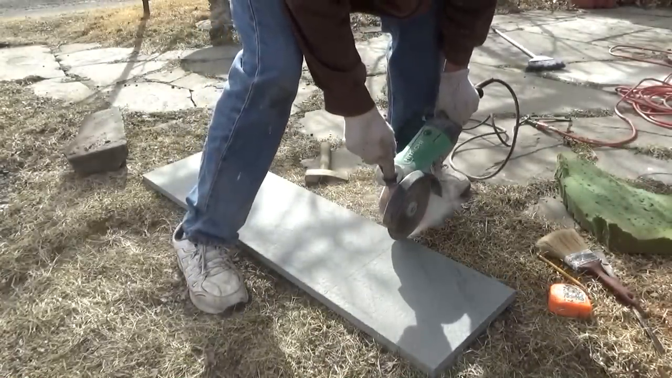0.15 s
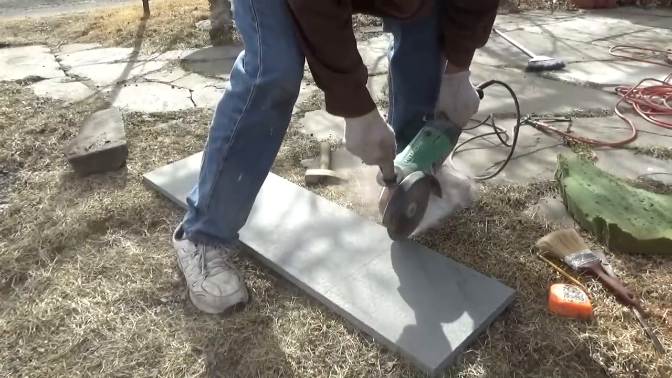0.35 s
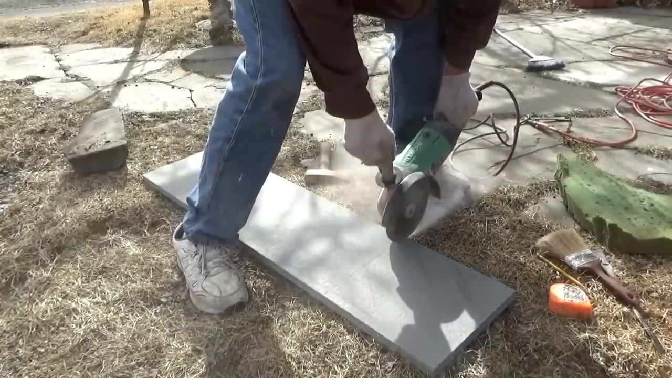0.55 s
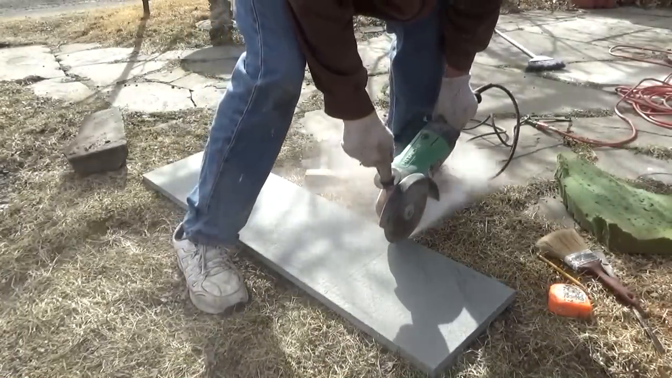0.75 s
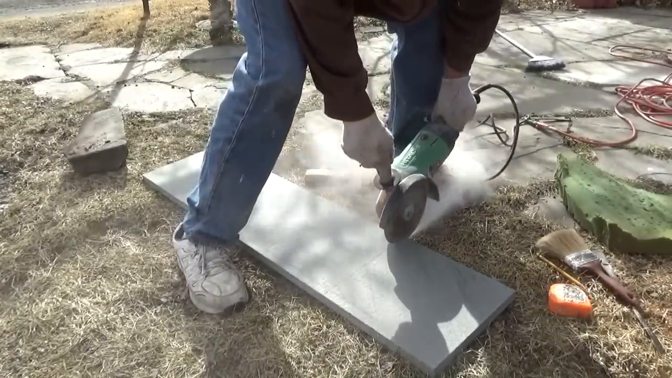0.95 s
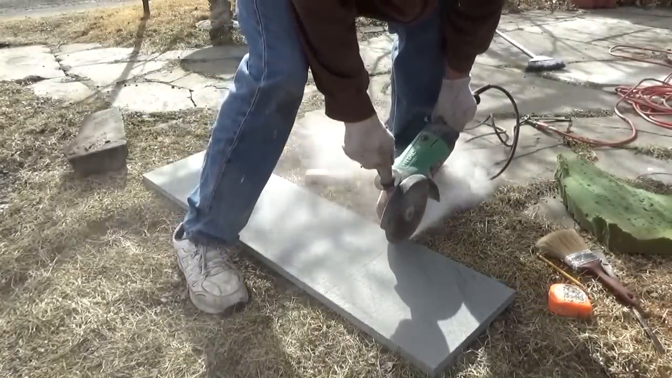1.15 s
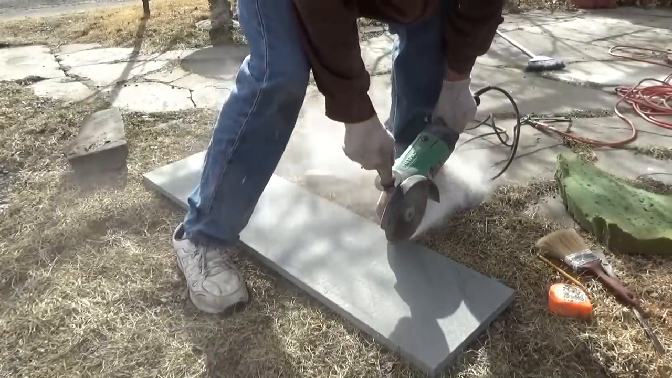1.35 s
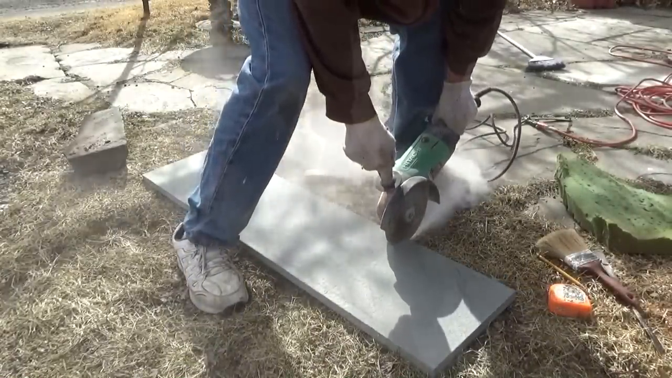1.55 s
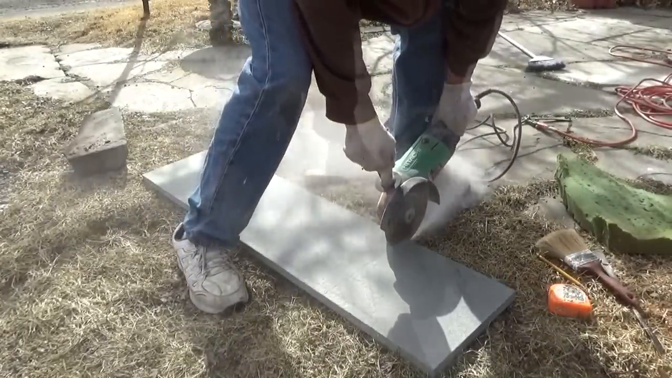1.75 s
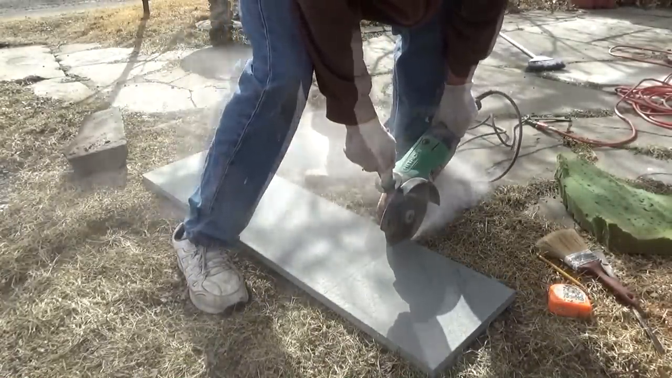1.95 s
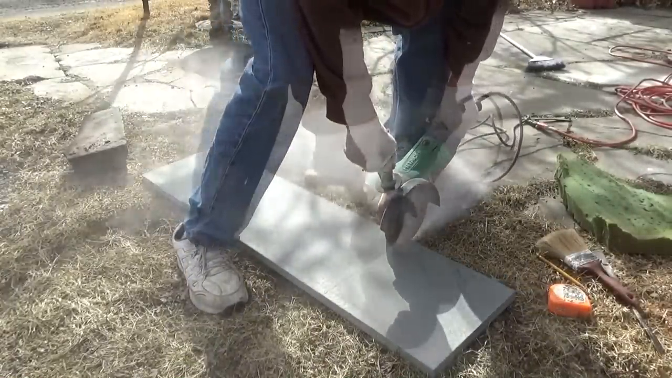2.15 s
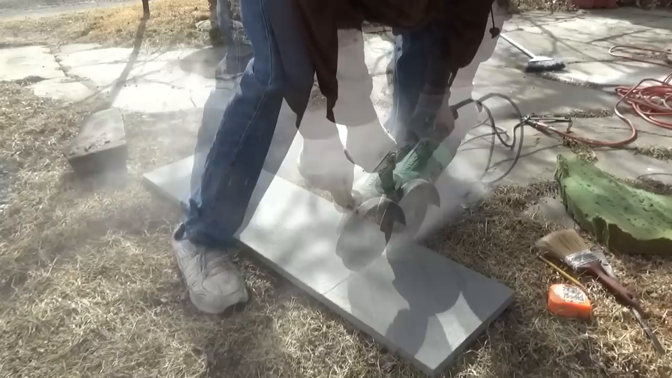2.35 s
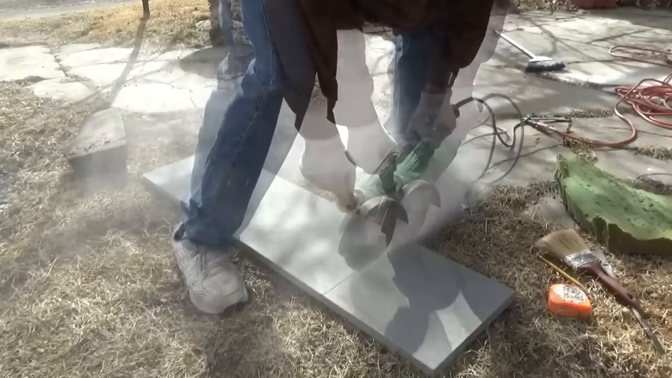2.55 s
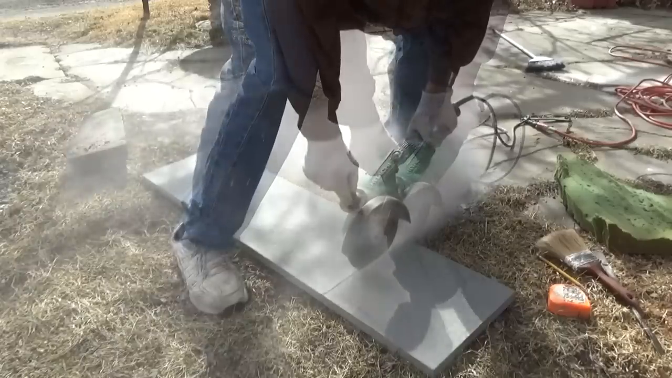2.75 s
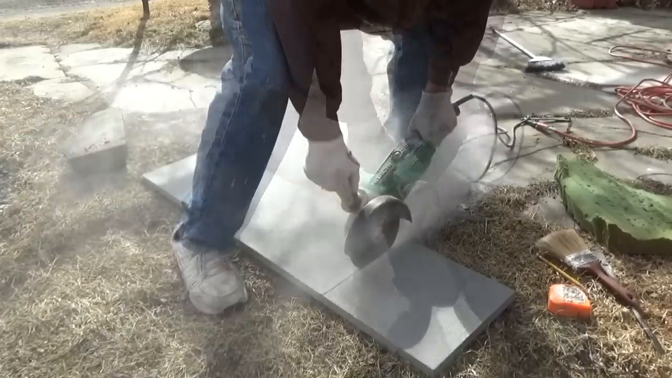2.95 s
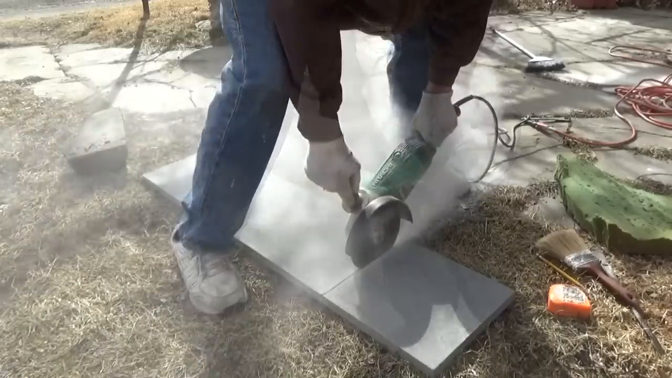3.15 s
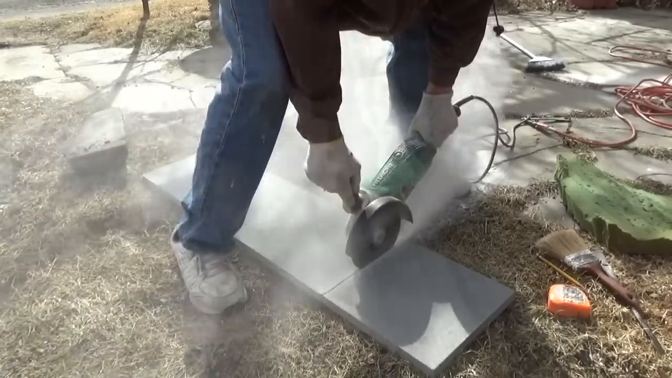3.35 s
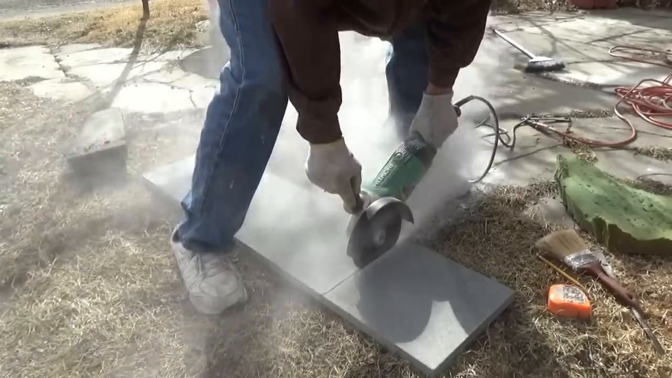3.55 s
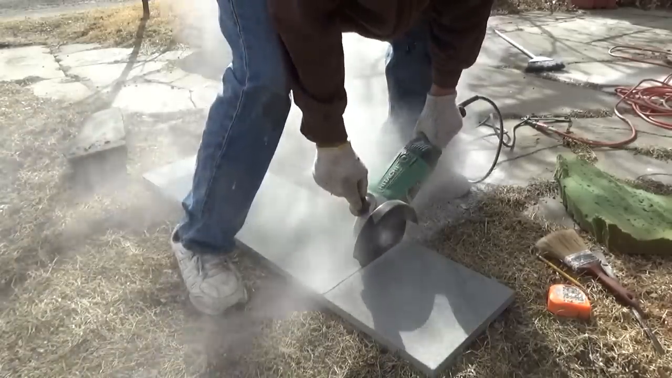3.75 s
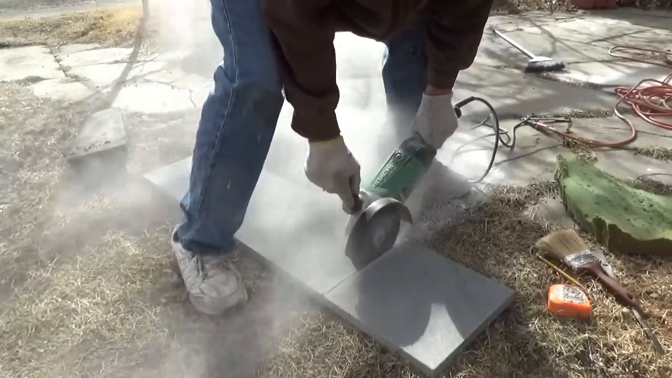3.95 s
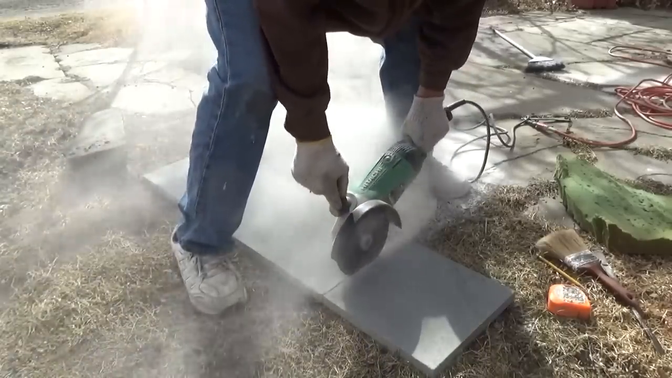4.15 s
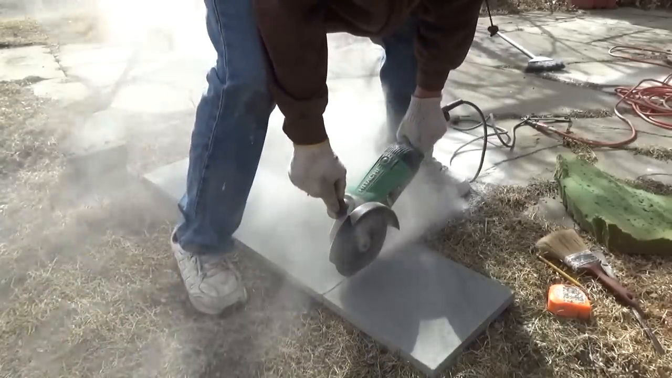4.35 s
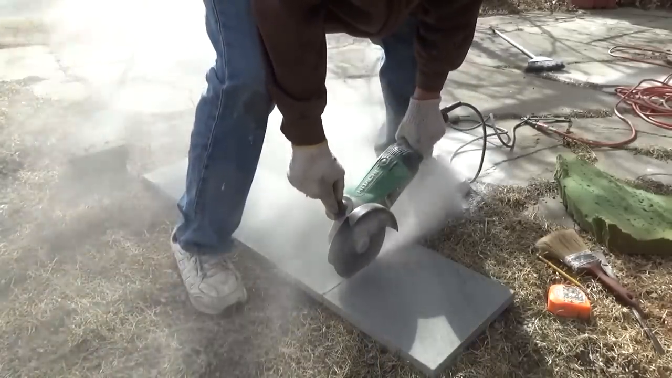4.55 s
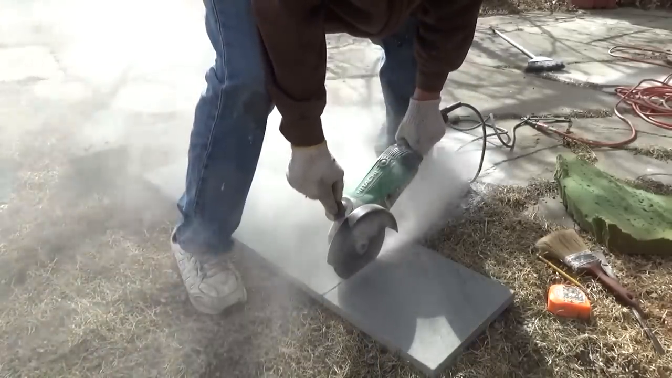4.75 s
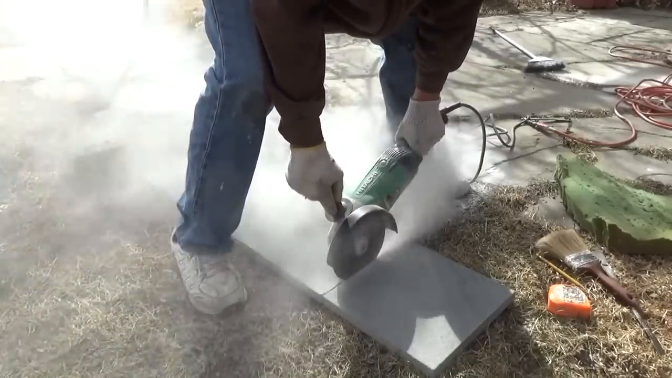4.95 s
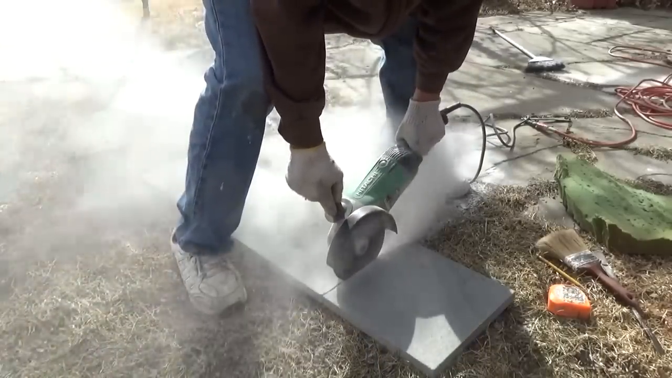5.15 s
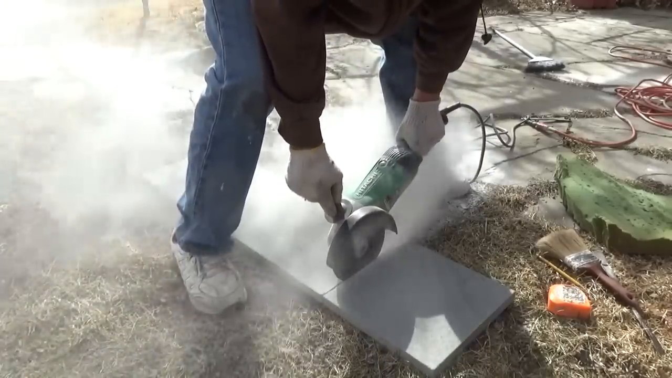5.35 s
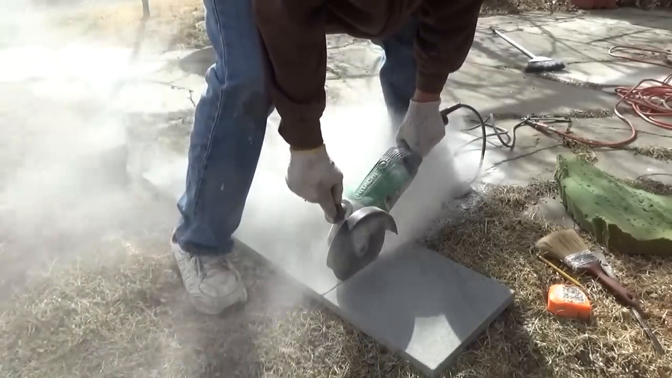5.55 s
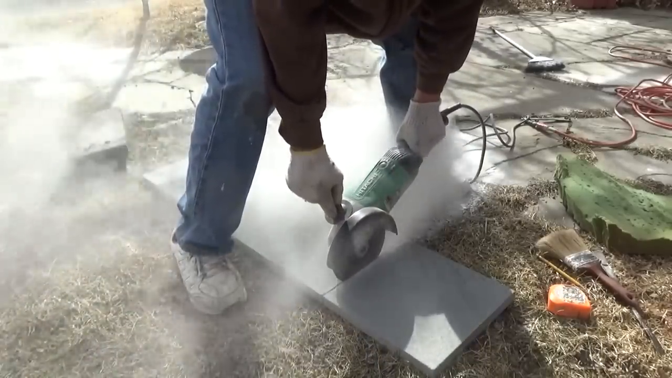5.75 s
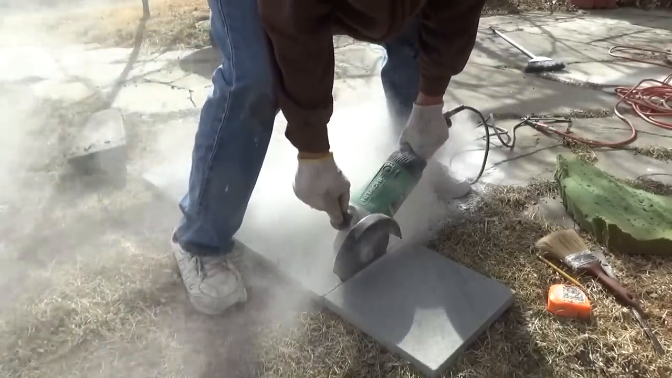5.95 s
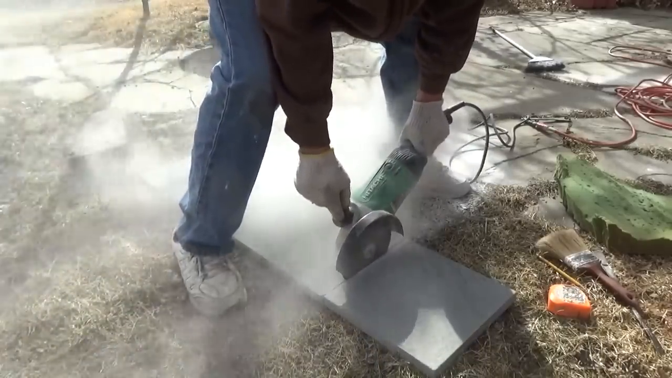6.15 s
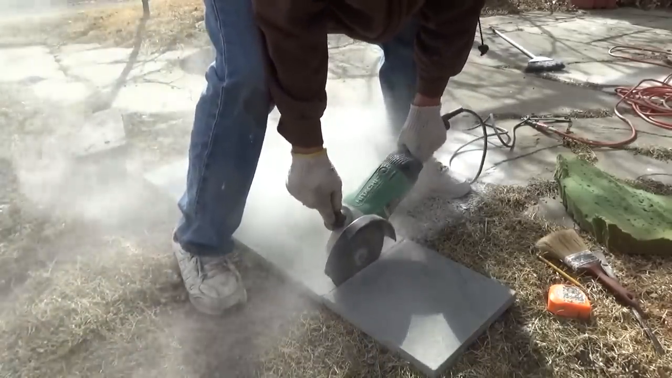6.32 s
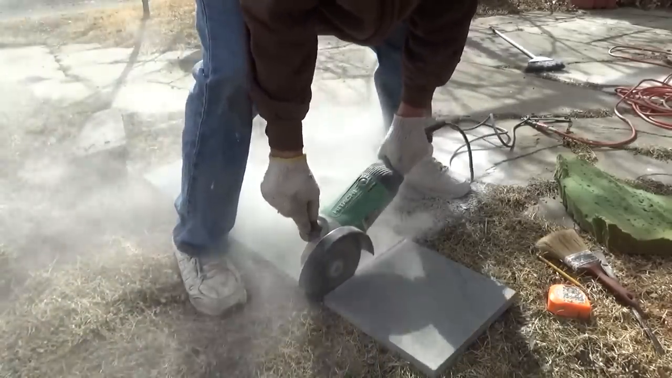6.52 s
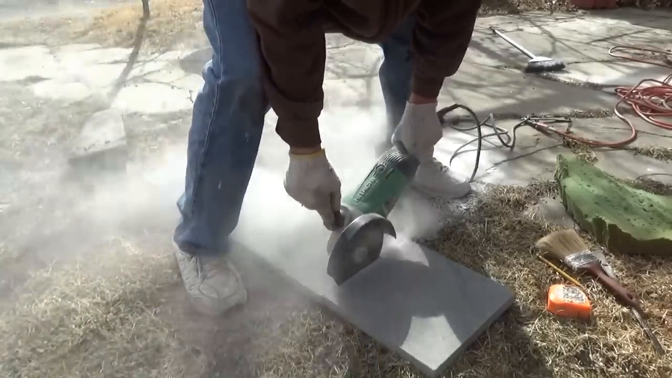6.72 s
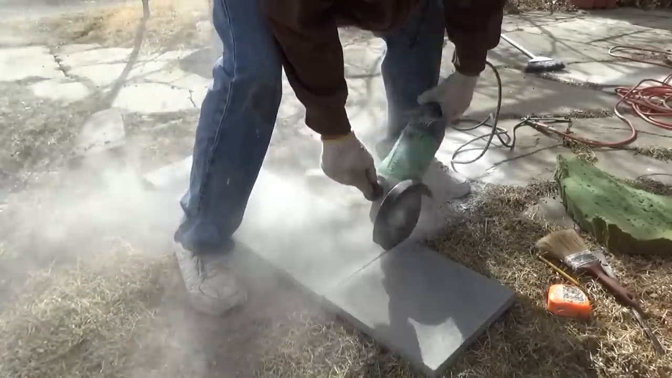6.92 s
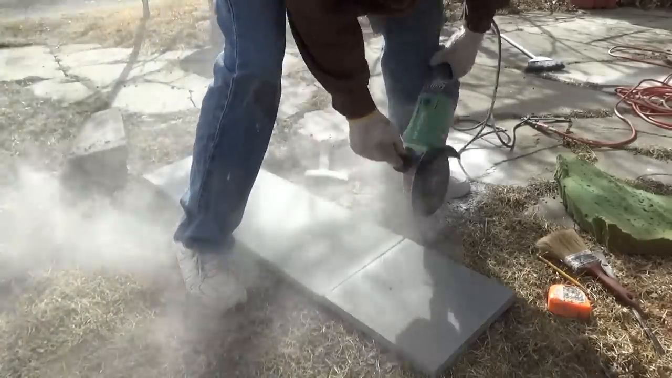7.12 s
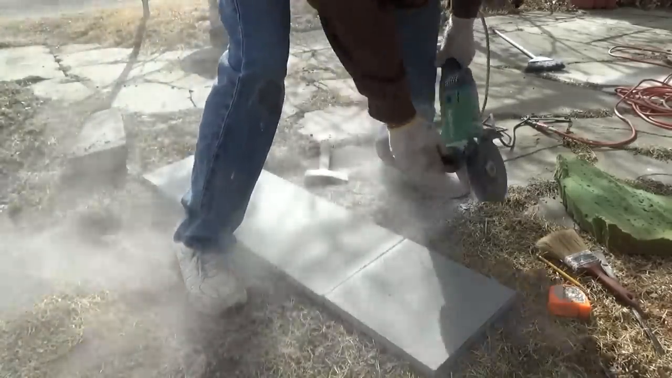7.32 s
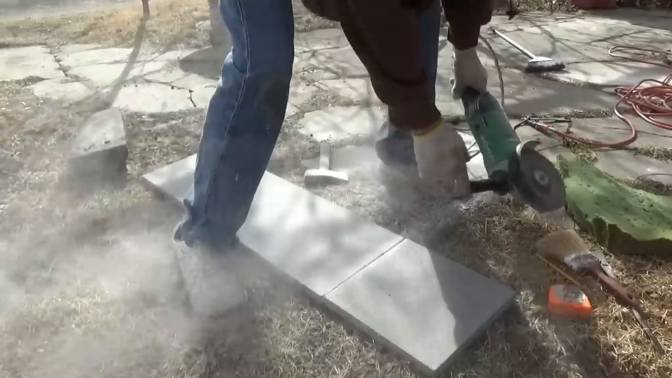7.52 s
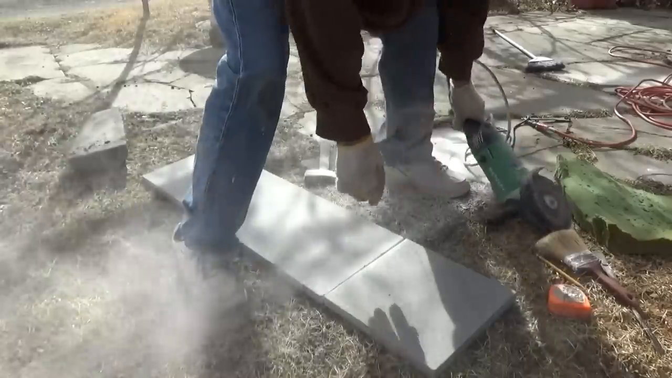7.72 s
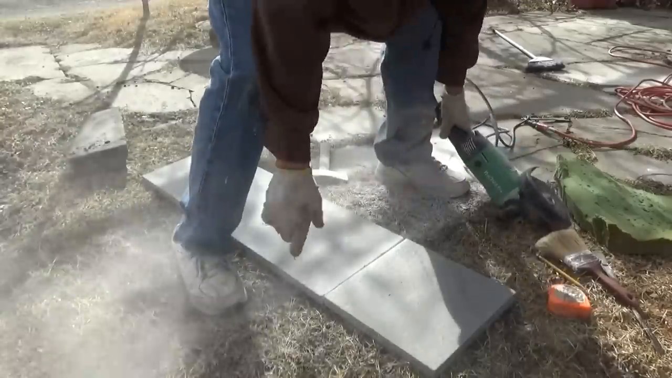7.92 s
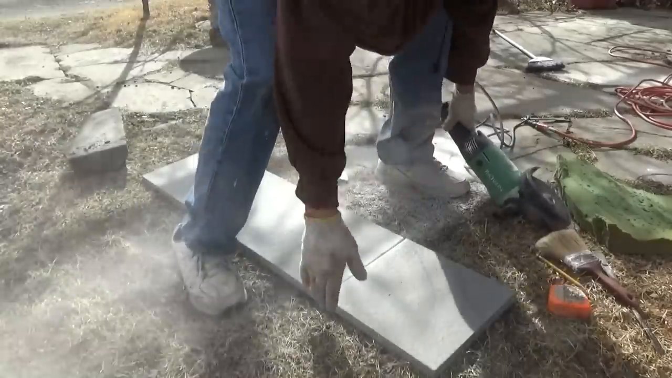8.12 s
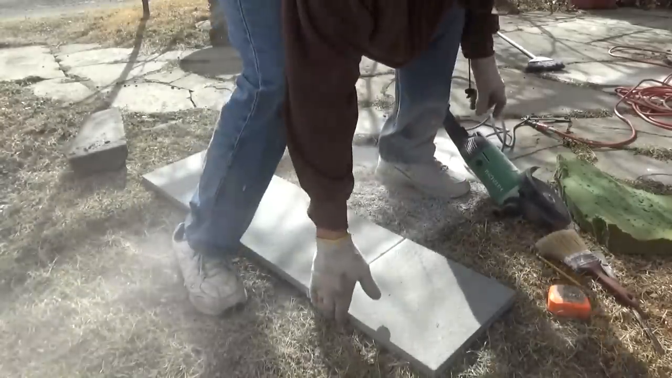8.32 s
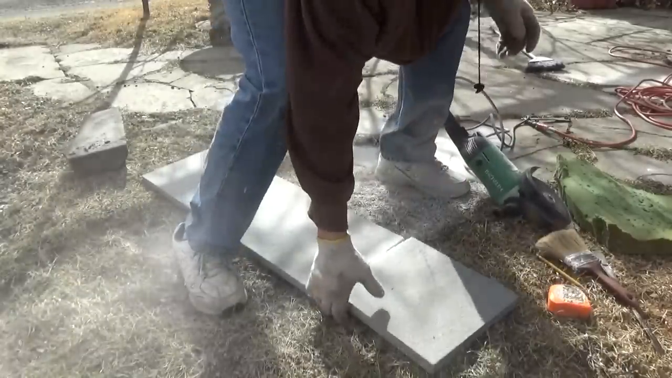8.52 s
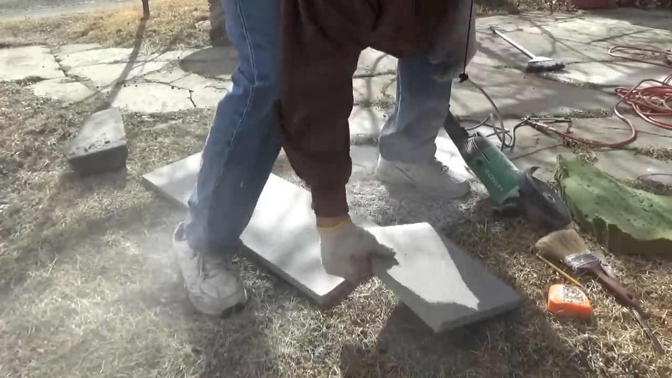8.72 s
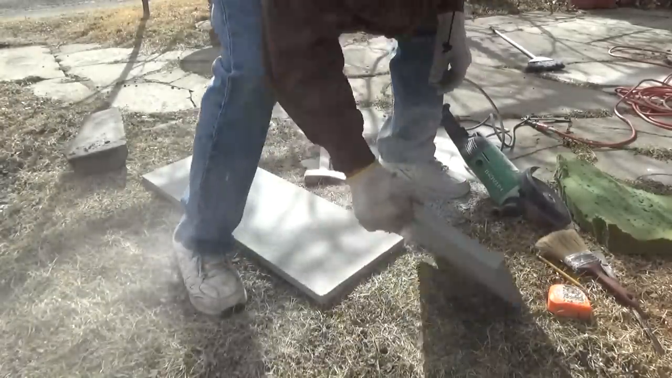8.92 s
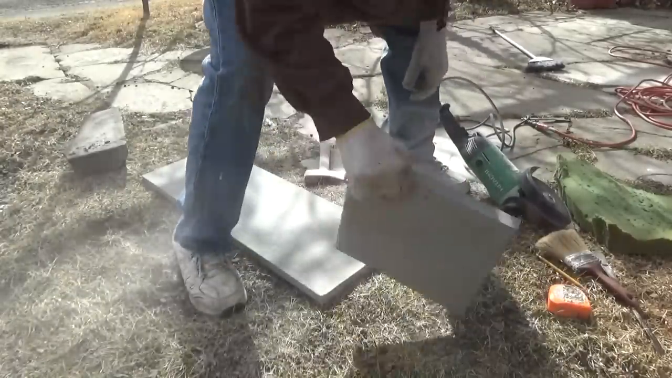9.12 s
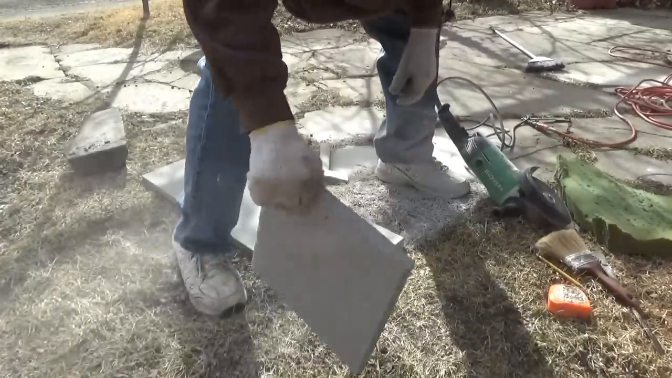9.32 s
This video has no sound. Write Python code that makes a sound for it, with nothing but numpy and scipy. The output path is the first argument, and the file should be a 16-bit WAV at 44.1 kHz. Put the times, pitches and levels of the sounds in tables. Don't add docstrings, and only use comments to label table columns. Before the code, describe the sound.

A steel disc bites a stone slab in an open yard, very loud and near the microphone, slightly overloaded. Its harsh metallic whine shifts as the slot deepens, with low buzzing rumble beneath. After uneven pushes it leaves the stone with a brief ring. Then a faint fan whirr winds down, loose gears click, glove and stone rub softly, and distant traffic wash comes up.

```python
import sys
import numpy as np
from scipy import signal
from scipy.fft import rfft, irfft, next_fast_len
from scipy.io import wavfile
from scipy.ndimage import uniform_filter1d

SR = 44100
rng = np.random.default_rng(int(sys.argv[2]) if len(sys.argv) > 2 else 0)


def unload_wav(signal):
    wavfile.write(
        sys.argv[1],
        SR,
        np.round(np.clip(np.atleast_2d(signal).T, -1, 1) * 32767).astype(np.int16),
    )


def amplitude_ratio(level_db):
    exponent = np.asarray(level_db, float) / 20
    return 10 ** exponent


N = 418068

# t/s, level/dB
CUTTING_FORCE = [(0, -12.5), (.09, -17.5), (.13, -13.5), (.96, -12), (1.55, -9.5), (1.9, -10), (2.14, -7.5),
                 (3.04, -6), (3.62, -7.5), (3.87, -7.5), (4.32, -8), (5.88, -8), (6.04, -10.5), (6.85, -13),
                 (6.96, -13), (7.005, -16), (7.03, -23), (7.05, -35.5)]
# t/s, whirr level/dB, yard level/dB, left minus right/dB
COASTING_LEVELS = [
    (7.05, -30.5, -45, -3),
    (7.33, -34, -46, -3),
    (7.66, -35.5, -45, -3.5),
    (7.9, -38, -41.5, -3),
    (8.94, -36.5, -38.5, -3),
    (9.48, -36, -38.5, -3),
]


def unit(x):
    return x / np.sqrt(np.mean(x ** 2) + 1e-20)


def noise():
    return rng.standard_normal(N)


def curves(rows):
    s, *cols = np.transpose(rows)
    return [np.interp(np.arange(N) / SR, s, c) for c in cols]


def wobble(rate_hz, depth_db=None, span=slice(None)):
    knots = rng.standard_normal(500)
    if depth_db is not None:
        knots = amplitude_ratio(depth_db * knots)
    return np.interp(np.arange(*span.indices(N)) * rate_hz / SR, np.arange(500), knots)


def window(start_s, end_s, edge_s):
    t = np.arange(N) / SR
    return np.clip(np.minimum(t - start_s, end_s - t) / edge_s + .5, 0, 1)


def coloured(x, spectrum):
    m = next_fast_len(N + 8192)
    f_hz, db = np.transpose(spectrum)
    bins_hz = np.fft.rfftfreq(m, 1 / SR)
    gain = amplitude_ratio(np.interp(np.log(bins_hz + 1), np.log(f_hz + 1), db))
    return unit(irfft(rfft(x, m) * gain, m)[..., :N])


def resonant(force, modes, drift_db, rate_hz):
    out, driven = np.zeros(N), np.flatnonzero(force)
    span = slice(driven[0], driven[-1] + SR // 3)
    for k, (hz, width_hz, db) in enumerate(modes):
        b, a = signal.iirpeak(hz, hz / max(width_hz, 3), SR)
        drive = force[span] * wobble(rate_hz, drift_db, span)
        out[span] += signal.lfilter((-1) ** k * amplitude_ratio(db) * b, a, drive)
    return out


def effort(free):
    # t/s, added force/dB, release/s
    shoves = [
        (3.84, -0.5, 0.044),
        (3.91, 3.5, 0.48),
        (5.93, 4, 0.13),
        (6.13, 1.5, 0.29),
        (6.378, 10, 0.32),
        (6.69, 6.5, 0.22),
        (6.8, 5, 0.024),
        (6.9, 1.5, .1),
    ]
    rise_s, usual_db = 0.075, -8
    t = np.arange(N) / SR
    force_db = curves(CUTTING_FORCE)[0]
    for s, db, release_s in shoves:
        force_db = force_db + db * np.interp(t - s, [-rise_s, 0, release_s], [0, 1, 0])
    extra_db = force_db - usual_db
    ring_db = -17 + 0.38 * extra_db
    rumble_db = -33 + (0.54 + 1.85 * free) * np.maximum(extra_db, -12) - 6 * free
    return force_db, ring_db, rumble_db


def grit(keep, jitter_turns):
    # t/s, speed/(turns/s)
    spindle = [(0, 90.7), (.14, 90.2), (.56, 83), (.98, 71), (1.25, 66), (1.53, 62.2), (1.95, 59.2),
               (2.65, 55.2), (2.93, 52.1), (3.65, 51), (4, 62), (4.3, 54), (4.6, 51.6), (5.29, 51.8),
               (5.85, 47.8), (6.7, 77), (7.1, 80)]
    turns = np.cumsum(curves(spindle)[0]) / SR + jitter_turns * wobble(30) + 1
    turn = turns.astype(int)
    angle = (turns % 1 * 1024).astype(int)
    rim = signal.lfilter([1], [1, -min(keep, .995)], rng.standard_normal((900, 1024)), axis=0)
    knock = np.diff(turn, prepend=1).clip(0, 1)
    return unit(rim[turn, angle]), unit(knock), noise()


def disc(low, high, depth, free, force_db, ring_db):
    # f/Hz, width/Hz, level/dB
    scoring = [(1558, 56, -8.5), (2250, 49, -10), (2426, 52, -18), (3686, 76, -3), (4100, 160, -16),
               (4560, 190, -3.5), (5443, 150, 2.5), (5770, 50, 3), (6658, 74, 9), (7080, 53, -1),
               (7660, 26, 8), (8040, 250, -12), (8900, 160, -21), (10100, 290, -3), (10620, 130, -5),
               (11400, 270, -6.5), (12400, 67, -22), (12300, 140, -17), (13300, 31, -32)]
    grooved = [(1576, 56, -7.5), (1910, 14, -29), (2008, 32, -8), (2600, 15, -30), (2932, 15, -5.5),
               (3860, 30, -1), (4686, 36, -3), (5260, 72, -3), (5820, 125, -8), (6520, 64, 5),
               (7720, 220, -8), (8850, 21, 3.5), (9500, 54, 0), (9830, 73, 4.5), (10720, 62, 0.5),
               (12310, 210, -3.5), (13000, 70, -8), (13160, 170, -16)]
    slotted = [(1497, 36, -9.5), (2894, 200, -6), (3935, 74, -9), (4890, 79, -20), (5200, 107, -7),
               (6670, 120, -7), (7730, 49, -10), (9420, 160, -3), (10700, 36, 1), (10940, 230, -15),
               (12550, 130, -1), (12800, 82, -21.5), (14400, 200, -15), (14200, 140, -22)]
    buried = [(1467, 32, -8), (1815, 34, -5.5), (2650, 39, -10.5), (2973, 55, -11.5), (3560, 10, -20),
              (4170, 66, -7), (4717, 110, -6), (5290, 190, -4), (6294, 205, -6.5), (7670, 236, 2.5),
              (9560, 200, -9.5), (10375, 140, 2.5), (11260, 270, -15.5), (12030, 58, -2), (12800, 58, -8),
              (13300, 90, -28), (14400, 220, -15)]
    free_disc = [(1673, 20, -6.5), (2038, 37, -6), (2270, 19, -12.5), (2657, 35, -5.5), (3023, 46, -6.5),
                 (3503, 30, -4.5), (4046, 31, -8.5), (4770, 150, -10), (5293, 79, -4), (5760, 105, -10.5),
                 (6570, 46, -6), (6525, 68, -7), (7770, 57, -7.5), (7540, 11, -19), (8090, 55, -4.5),
                 (8540, 42, -11), (9210, 52, -3), (10260, 77, -10), (11100, 39, -20), (10960, 17, -7.5),
                 (11630, 83, -10), (15000, 260, -57)]
    # f/Hz, width/Hz, level/dB
    lingering = [(2280, 9, -4), (3050, 6, -4), (3463, 6, 0), (3385, 5, -1), (4060, 12, -10),
                 (4720, 10, -10), (8030, 18, -9)]
    # t/s, level/dB
    parting = [
        (7.003, 29),
        (7.081, 28),
    ]
    strike = low * free ** 2 * np.interp(np.arange(N) / SR, [6.7, 6.9], [.3, 1]) * amplitude_ratio(ring_db + 21.0)
    for s, db in parting:
        strike[round(s * SR)] += amplitude_ratio(db)
    out = resonant(strike, lingering, drift_db=-1.5, rate_hz=5.3)
    held = [np.sqrt(np.clip(1 - abs(depth - k), 0, 1) * (1 - free)) for k in range(4)]
    # modes, low level/dB, high level/dB
    states = [(scoring, 22, 15), (grooved, 17, 13), (slotted, 21, 12), (buried, 21, 13), (free_disc, 22, 17)]
    for share, (modes, low_db, high_db) in zip(held + [np.sqrt(free)], states):
        low_modes = [m for m in modes if m[0] < 4400]
        high_modes = [m for m in modes if m[0] >= 4400]
        out += resonant(low * share * amplitude_ratio(ring_db + low_db), low_modes, drift_db=2.5, rate_hz=6)
        out += resonant(high * share * amplitude_ratio(force_db + high_db), high_modes, drift_db=1.2, rate_hz=5)
    return out


def flaring(push):
    # f/Hz, width/Hz, level/dB, start/s, end/s
    flaring_modes = [(368, 65, -10, 1, 2.26), (576, 33, -6.5, -0.8, 2.6), (805, 19, 0.5, 0.94, 2.45),
                     (1060, 120, -7, .36, 1.32), (2137, 21, 3, 1, 2.2), (1044, 35, -5, 1.2, 2.5),
                     (1225, 21, -7, 1.1, 2.3), (652, 35, -0.5, 2.4, 2.7), (1167, 60, 0, 3, 4.5),
                     (633, 32, 0.5, 4.08, 4.72), (654, 55, -6, 4.8, 5.5), (4920, 83, 20, 3.76, 4),
                     (4680, 59, 13, 3.5, 3.74), (5290, 61, 18, 4.2, 4.7), (1080, 47, -3, 4.05, 4.9),
                     (1156, 37, 3.5, 5, 5.92), (677, 16, 5.5, 5.5, 5.93), (400, 39, -5, 4.5, 5.9),
                     (1454, 50, 6, 5.45, 5.92), (1480, 38, -4, 4.85, 5.4), (1710, 61, 22, 6.05, 6.33),
                     (1564, 70, 11.5, 0, 0.13), (1572, 43, 11.5, .2, 0.36), (2204, 46, 6.5, 0, .33),
                     (1130, 60, -7, 4.05, 4.25), (6820, 28, 7, 0, .35), (1670, 43, 24.5, 6.88, 7.02),
                     (1815, 37, 19, 3.62, 3.73), (2070, 42, 10, 3.6, 3.72), (1800, 69, 15.5, 3.95, 4.05),
                     (1848, 43, 9, 4.7, 5.3), (1620, 28, 16, 1.92, 2.5), (1800, 47, 22.5, 6.48, 6.85),
                     (2320, 43, 5, 3.75, 4.0), (888, 42, -2, 6.0, 8.2), (5350, 33, 25.5, .05, 0.2),
                     (4730, 24, 18, 1.95, 2.24), (1690, 40, 13, 3.72, 3.96),
                     (4090, 36, 15.5, 0, 0.5),
        (2640, 31, 10.5, 4.2, 4.6),
        (2964, 68, 9, 4.75, 5.1),
        (2050, 45, 9, 5.96, 6.2),
        (3020, 44, 21, 6.04, 6.35),
        (2280, 40, 11, 6.1, 6.33),
        (5310, 100, 28, 6.78, 7.01),
        (1795, 43, 16.5, 4.2, 4.7),
    ]
    out = np.zeros(N)
    for hz, width_hz, db, start_s, end_s in flaring_modes:
        drive = push * window(start_s, end_s, 0.052)
        out += resonant(drive, [(hz, width_hz, db)], drift_db=1.2, rate_hz=14)
    return out


def cut():
    # t/s, slot depth/0-3 (4 and above: held modes silent), share of disc free, share of grit repeating
    contact_states = [(0, 0.42, 0.14, 0.82), (.9, 0.5, 0, 0.84), (1.4, 1, 0.12, 0.81),
                      (2.1, 1.5, 0.28, 0.94), (2.5, 4, 0.1, 0.49), (3.6, 3, 0.019, 0.38),
                      (3.72, 4, 0.32, 0.63), (3.95, 4, 0.62, 0.14), (4.12, 3.5, 0.094, 0.43),
                      (5.9, 3, 0, 0.7), (5.94, 7, 0.045, .15), (5.97, 2, 0.91, 0.17),
                      (6.33, 3, 0.94, 0.083), (6.38, 4, 0.57, 0.4), (6.8, 3.5, 0.76, 0.14),
                      (6.85, 3.5, 0.81, 0.54)]
    # f/Hz, level/dB
    spray = [(710, -89), (1200, -59), (1470, -5), (2400, -13.5), (2850, -8.5), (3300, -11.5), (4250, -8),
             (4670, -7.5), (6360, 2.5), (8680, -0.5), (10500, 2), (15500, -16)]
    # f/Hz, level/dB
    slab = [(12, -51), (20, -17), (396, -1), (738, -2.5), (807, 2), (947, 0), (1330, 1), (1400, -1.5),
            (1820, -51), (3080, -120)]
    # f/Hz, level/dB
    apart_spectrum = [(25, -34), (150, -17), (500, 3.5), (1200, 5.5), (2300, -6), (4100, -60)]
    # f/Hz, level/dB
    bright_apart = [(1000, 14.5), (3000, 1), (6300, 4.5), (9500, 3.5), (15000, 3)]
    delay_s, bright_apart_db = 0.0079, -28
    depth, free, repeats = curves(contact_states)
    free, repeats = np.clip(free, 0, 1), np.clip(repeats, 0, 1)
    force_db, ring_db, rumble_db = effort(free)
    touching = np.arange(N) < CUTTING_FORCE[-1][0] * SR
    contact = touching * amplitude_ratio((0.64 + 0.45 * free) * wobble(45))
    repeated, knock, fresh = grit(keep=.95, jitter_turns=.0007)

    def mix(share):
        return contact * (np.sqrt(share) * repeated + np.sqrt(1 - share) * fresh)

    low, high = mix(repeats), mix(0.61 * repeats)
    out = disc(low, high, depth, free, force_db, ring_db)
    out += flaring(contact * (1.6 * repeats * knock + .3 * fresh) * amplitude_ratio(rumble_db + 21))
    out += amplitude_ratio(force_db - 2.5) * (1 - 0.65 * free) * coloured(high, spray)
    out += amplitude_ratio(rumble_db - 2.5) * coloured(high, slab)
    apart = amplitude_ratio(rumble_db - 9) * contact * coloured(noise(), apart_spectrum)
    apart += amplitude_ratio(bright_apart_db) * coloured(np.roll(out, round(delay_s * SR)), bright_apart)
    lean_db = np.interp(np.arange(N) / SR, [0, 2.2, 6.5], [-.5, 0, .2])
    return out * amplitude_ratio([lean_db / 2, -lean_db / 2]) + np.array([apart, -apart])


def yard():
    # f/Hz, level/dB
    wash_spectrum = [(12, -79), (20, -49), (59, -16), (82, -14), (276, -9.5), (652, 2), (848, -5),
                     (1330, -2), (1730, -10), (1910, -24), (2540, -13), (3380, -11.5), (6000, -12),
                     (7800, -38), (13200, -120)]
    # f/Hz, level/dB
    engine = [(75.4, -55), (102.3, -58), (129.2, -59), (177.6, -61)]
    t = np.arange(N) / SR
    yard_db = curves(COASTING_LEVELS)[1]
    sound = amplitude_ratio(0.33 * wobble(14)) * coloured(noise(), wash_spectrum)
    for hz, db in engine:
        level = amplitude_ratio(db + 42.5 + 4.2 * (t - 9.0) + 1.8 * wobble(2.27))
        sound += level * np.sin(2 * np.pi * hz * t + .4 * wobble(6))
    air = amplitude_ratio(-14.5) * coloured(noise(), [(100, -20), (500, -24), (1500, 16), (8000, -7)])
    return amplitude_ratio(yard_db - 1.5) * (sound + np.array([air, -air]))


def whirr():
    # f/Hz, level/dB
    whirr_spectrum = [(590, -45), (1000, -13), (1440, -33), (1510, -3), (1640, -9), (1840, -2.5),
                      (3180, 0.5), (6180, -11), (9450, -14.5), (11000, -16.5), (15500, -46)]
    # f/Hz, width/Hz, level/dB
    stirred = [(1600, 164, 2), (4700, 120, -9), (8700, 140, -20), (9600, 680, -8), (7000, 250, -9),
               (3400, 300, -12)]
    level = amplitude_ratio(curves(COASTING_LEVELS)[0] - 2) * wobble(25, 0.74) * window(6.98, 99, 0.095)
    out = level * coloured(noise(), whirr_spectrum)
    gears = amplitude_ratio(-31.5) * window(6.8, 99, 0.24) * noise()
    return out + resonant(gears, stirred, drift_db=2.2, rate_hz=18)


def gear_ticks():
    # t/s, peak level/dB, upper guard ring/dB, low knock/dB
    ticks = [(7.0828, -26, -4, -5), (7.212, -40, -2, -2), (7.2814, -30, -4, -3), (7.3367, -33, -5, -9),
             (7.3474, -39, 5, 1), (7.4395, -32, -1, -4), (7.533, -33, 8, 1), (7.6121, -38, 2, 3),
             (7.8002, -35, -8, -6), (7.87, -35, -3, -6), (7.9184, -45, 0, -1), (8.0636, -39, -7, -1),
             (8.3574, -39, 4, -1), (8.5719, -39, 0, 2), (8.6824, -43, 15, 5), (8.8424, -34, -7, -6),
             (8.9126, -36, -8, 1), (9.0239, -40, 2, 5), (9.1431, -46, 2, 2), (9.2309, -35, -12, -7),
             (9.3242, -38, -8, -1), (9.3861, -41, 1, -3)]
    # f/Hz, level/dB, t60/s, 1 = upper ring
    guard = [(8620, 0, .04, 0), (9460, -2, .035, 1), (10200, -10, .025, 1), (12900, -24, .03, 1)]
    # f/Hz, level/dB, t60/s
    housing = [(1743, -13, 0.088), (3010, 6, 0.013), (3950, -6, 0.047), (4760, -5.5, 0.06),
               (6200, -10, .03)]
    scatter_db = 1.5
    out, t = np.zeros(N), np.arange(SR // 8) / SR

    def ring(modes, blur):
        total = np.zeros(len(t))
        for hz, db, t60_s in modes:
            decay = amplitude_ratio(db + scatter_db * rng.standard_normal() - 60 * t / t60_s)
            total += decay * np.sin(2 * np.pi * hz * t + blur)
        return total

    for s, db, upper_db, knock_db in ticks:
        blur = 4 * uniform_filter1d(rng.standard_normal(len(t)), size=90)
        guard_modes = [(hz, level + up * 0.94 * upper_db, t60_s) for hz, level, t60_s, up in guard]
        grains = np.convolve(rng.standard_normal(len(t)), [.3, 1, .7, -.7, -1, -.3], "same")
        crack = .25 * amplitude_ratio(-60 * t / .03) * grains
        tick = ring(guard_modes, blur) + amplitude_ratio(knock_db + 3) * ring(housing, blur) + crack
        tick *= 1 - np.exp(-t / 0.0023)
        tail = out[round(s * SR):][:len(t)]
        tail += amplitude_ratio(db + 4.5) * tick[:len(tail)]
    return out


def whistles():
    # f/Hz at 7.8 s, level/dB, start/s, end/s
    tones = [(1570, -51, 7.65, 8.3), (3150, -60, 8.1, 8.8), (5700, -61, 8.7, 9.6), (6060, -52, 8.08, 8.4),
             (8430, -54, 7.92, 8.6), (10050, -53.5, 7.84, 8.34), (9500, -62, 8.8, 9.6),
             (16800, -68, 8.8, 9.6), (6070, -52, 7.39, 7.5), (8430, -52, 7.64, 7.78),
             (8400, -54, 9.08, 9.3), (8480, -55, 7.4, 7.52), (8400, -59, 8.65, 8.9)]
    slowing_per_s = .2
    out, late = np.zeros(N), slice(7 * SR, N)
    t = np.arange(N)[late] / SR
    speed = np.exp(-slowing_per_s * (t - 7.8)) * (1 + .0013 * wobble(60, span=late))
    turns = np.cumsum(speed) / SR
    for hz, db, start_s, end_s in tones:
        level = amplitude_ratio(db) * wobble(25, 2.5, late) * window(start_s, end_s, .12)[late]
        out[late] += level * np.sin(2 * np.pi * hz * turns)
    return out


def handling():
    # t/s, level/dB, centre f/Hz, length/s
    scuffs = [
        (7.704, -40, 3500, .04),
        (8.5, -39, 3700, .015),
        (8.37, -43, 2500, .02),
        (8.3, -42, 4500, .02),
        (8.72, -42, 1600, .02),
        (8.58, -39, 1600, 0.035),
        (8.688, -39, 2700, .02),
        (8.848, -41, 1500, 0.079),
        (9.391, -41, 1800, 0.032),
        (9.47, -38, 2500, 0.018),
    ]
    t, out = np.arange(-SR // 5, SR // 5) / SR, np.zeros(N + SR)
    for s, db, hz, length_s in scuffs:
        b, a = signal.iirpeak(hz, 2.2, SR)
        rub = unit(signal.filtfilt(b, a, rng.standard_normal(len(t))))
        out[round(s * SR) - SR // 5:][:len(t)] += amplitude_ratio(db) * np.exp(-(t / length_s) ** 2) * rub
    return out[:N]


def scene():
    pan_db = curves(COASTING_LEVELS)[2]
    after = yard() + whirr() + gear_ticks() + whistles() + handling()
    return cut() + after * amplitude_ratio([pan_db / 2, -pan_db / 2])


def band_limit(x):
    return signal.sosfilt(signal.butter(12, 15750, fs=SR, output="sos"), x)


def record(dry):
    x = dry / (1 + np.abs(dry / 0.9) ** 6) ** (1 / 6)
    x = signal.lfilter(*signal.butter(1, 35, "high", fs=SR), x)
    return band_limit(x)


dry = scene()
out = record(dry)
unload_wav(out)
```